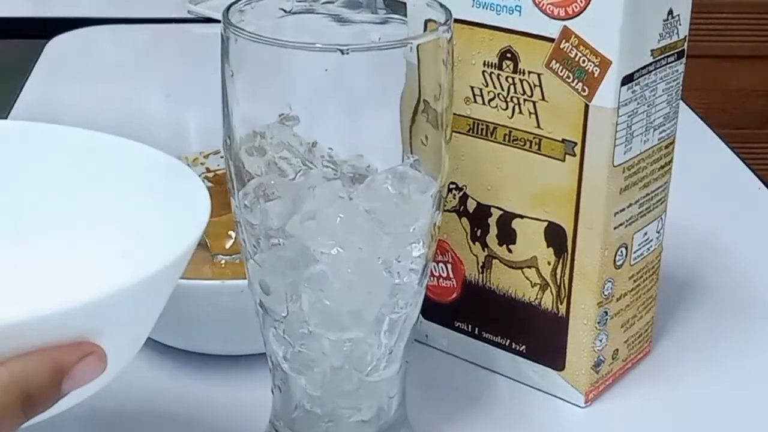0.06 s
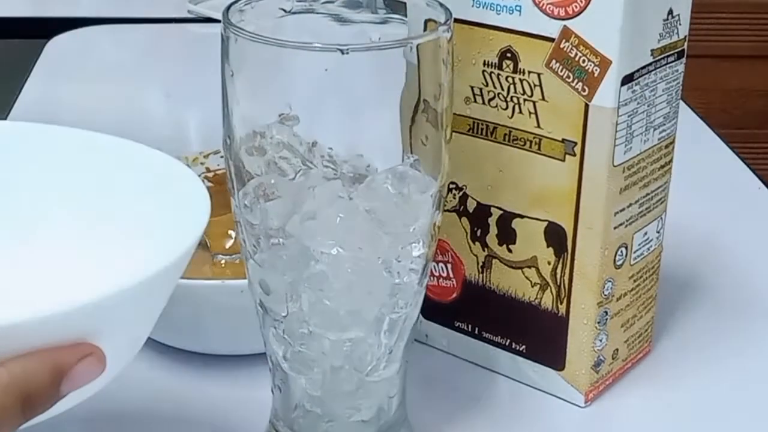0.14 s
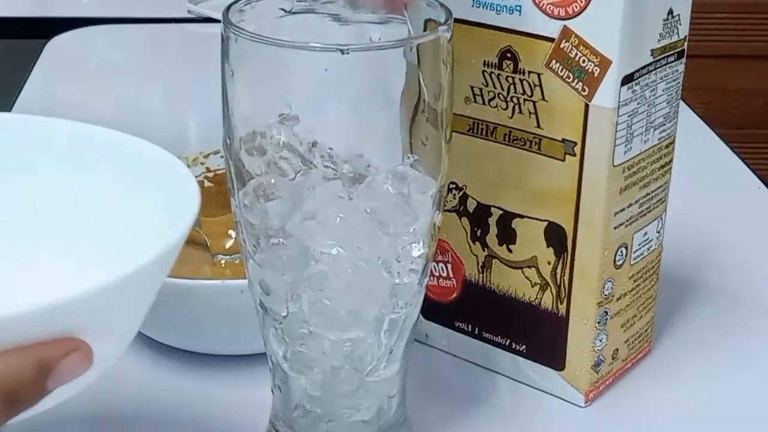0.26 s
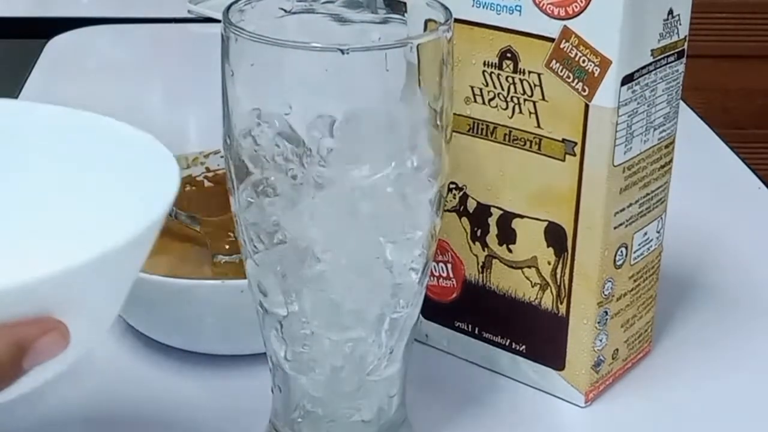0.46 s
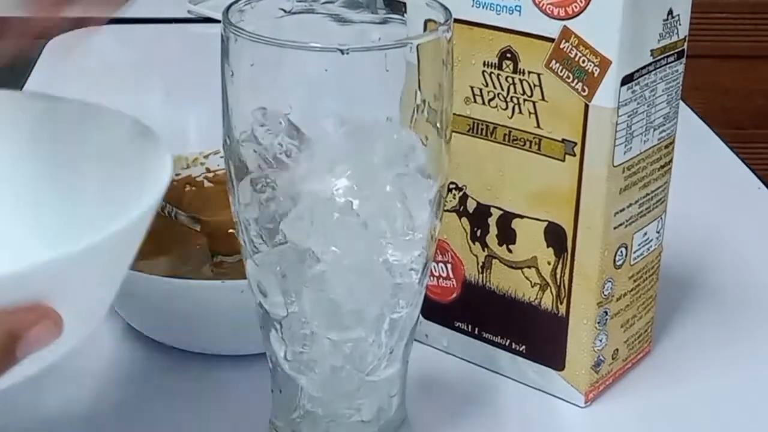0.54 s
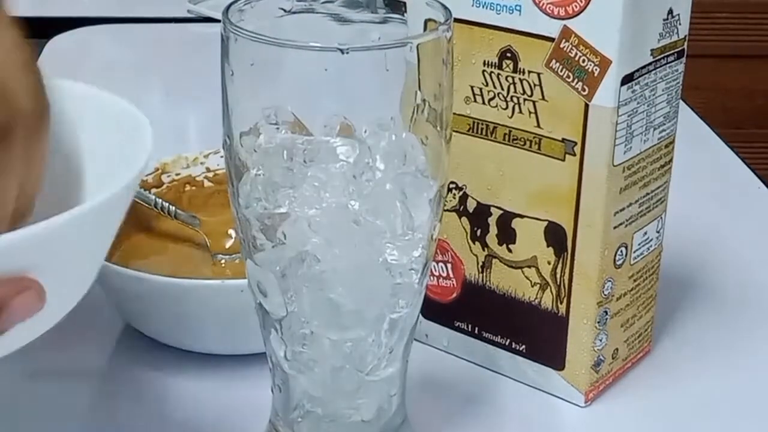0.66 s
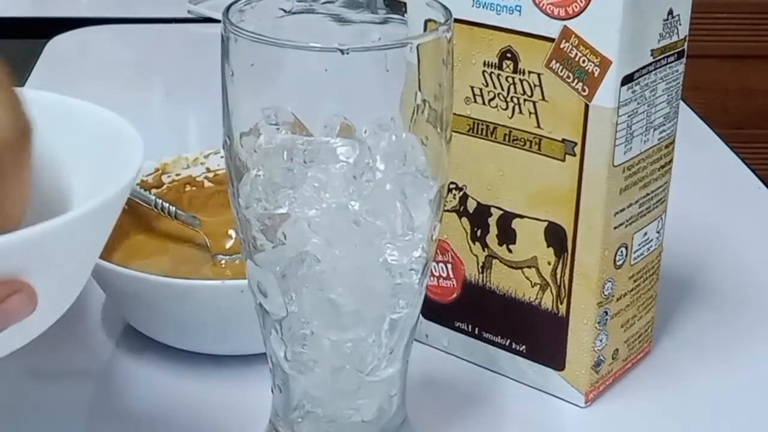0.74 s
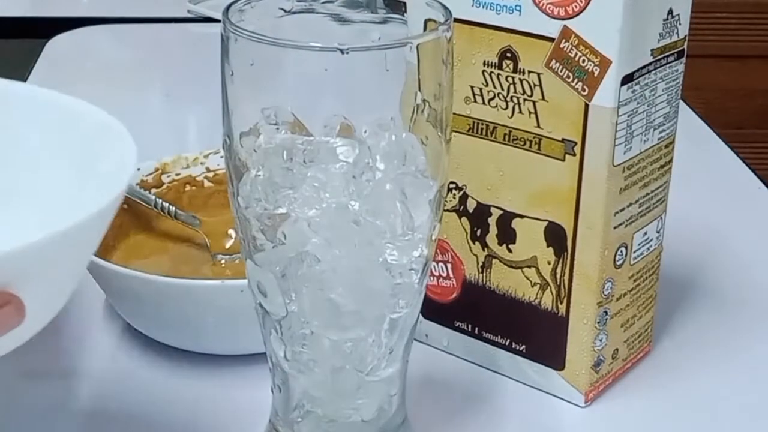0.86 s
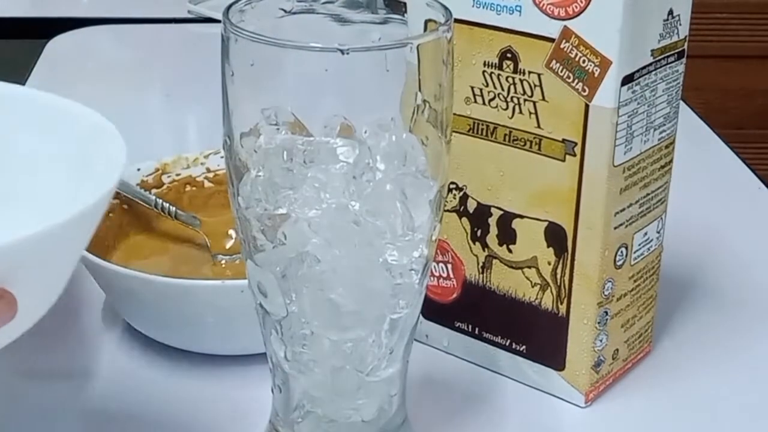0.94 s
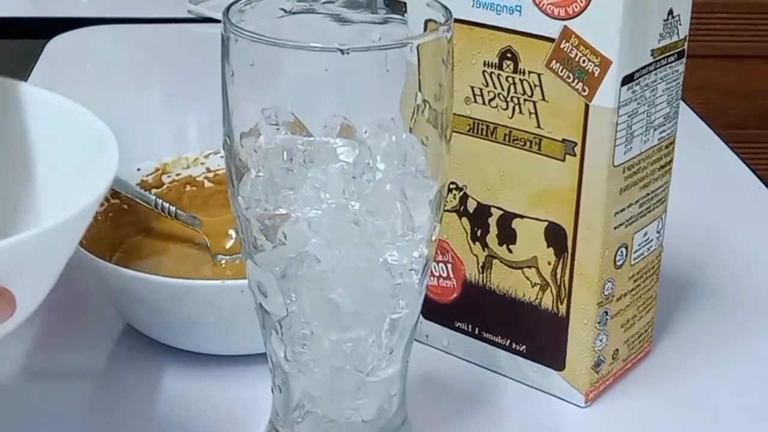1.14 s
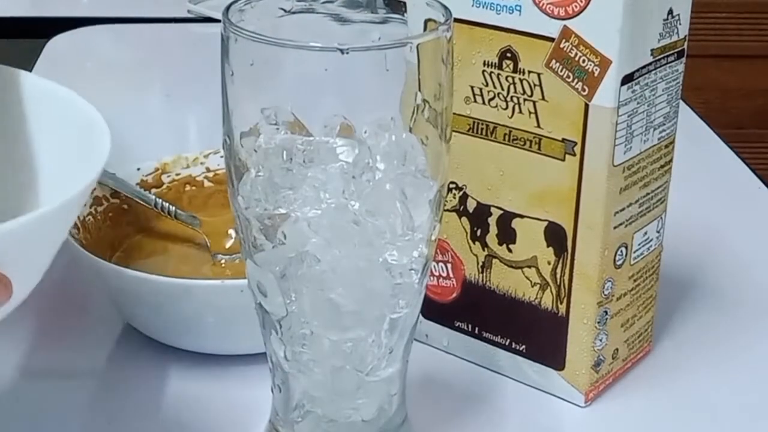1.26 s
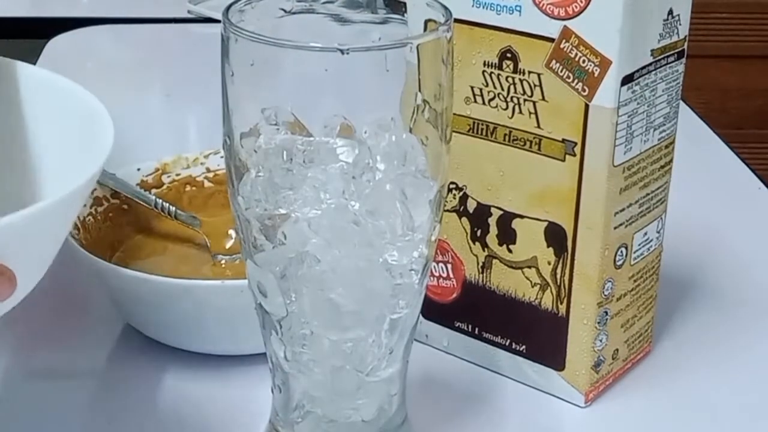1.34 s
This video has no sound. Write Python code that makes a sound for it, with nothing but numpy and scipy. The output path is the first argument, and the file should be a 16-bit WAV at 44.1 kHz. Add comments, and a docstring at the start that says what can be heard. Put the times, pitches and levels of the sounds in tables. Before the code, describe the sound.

Ice cubes clatter from a china bowl into a tall glass. They first skate faintly over the bowl, then from 0.2 to 0.6 seconds tumble in loudly, ticking on the glass and knocking on the ice inside. From 0.7 to 1.2 seconds leftover cubes slide and knock in the ringing bowl. A light rim clink comes near 1.4 seconds. Soft handling thumps and low kitchen noise lie underneath.

```python
"""Ice cubes are tipped from a hand-held china bowl into a tall glass half full of ice, in a small kitchen.
First they skate over the bowl and make it sing. From about 0.2 s they tumble into the glass, ticking on
its wall and knocking on the pile. From about 0.7 s the rest slide back in the bowl and knock together.
A light clink on the rim comes last. Soft handling thumps and a low room noise lie underneath."""
import sys
import numpy as np
from scipy import signal
from scipy.fft import rfft, irfft, next_fast_len
from scipy.io import wavfile

SR = 44100
rng = np.random.default_rng(int(sys.argv[2]) if len(sys.argv) > 2 else 0)


def inscribe(sig):
    """Save sig as 16-bit PCM at rate SR to the path in sys.argv[1].

    A 1-D sig is mono; a 2-D sig holds one channel per row.
    Samples are clipped to [-1, 1] before scaling.
    """
    pcm = np.round(np.clip(np.atleast_2d(sig).T, -1, 1) * 32767)
    wavfile.write(sys.argv[1], SR, pcm.astype(np.int16))


N = 61739
T = np.arange(N) / SR


# cubes land in the glass: start_s, crack_db, glass_db
GLASS_LANDINGS = [(0.2338, -39, -29), (0.2897, -19, -50), (0.2961, -22, -24), (0.345, -18.5, -22),
                  (0.3528, -16.5, -17), (0.3565, -20, -42), (0.3875, -23, -21.5), (0.3995, -19.5, -19),
                  (0.4265, -36, -22), (0.44, -36, -50), (0.4918, -20.5, -20.5), (0.5557, -30, -25.5),
                  (0.5715, -32, -25), (0.5934, -29, -37), (0.6153, -33, -36)]
# how loudly the cubes tumble on the pile and against the wall: time_s, pile_db, wall_db
TUMBLE_LEVELS = [(.22, -59, -60), (.3, -37.5, -42.5), (.34, -47.5, -37.5), (.36, -31, -23.5),
                 (.42, -34, -35), (.48, -33, -32), (.54, -37.5, -43), (.6, -33, -40), (.65, -42.5, -50.5),
                 (.76, -55, -62)]
# tones of the glass and the air in it: pitch_hz, level_db, ring_s (time to fade by 60 dB)
GLASS_TONES = [(610, -16.5, 0.13), (655.3, -1.5, 0.17), (1195, -7.5, 0.052), (1367, -5.5, 0.12),
               (1927, -9.5, 0.028), (2060, -5, 0.053), (2585, -7.5, 0.052), (7200, -5, 0.032)]
# how dull a knock on the pile is: frequency_hz, level_db
KNOCK_COLOUR = [(70, -13.5), (170, 2), (400, 2), (720, 4), (950, -3.5), (1300, 5), (2400, -7),
                (4000, -10.5), (10000, -46)]
KNOCK_DB, GLASS_RING_DB, TUMBLE_RING_DB = -3.5, -7, -6


def glass():
    """Cubes land on the pile with a dull knock and set the glass ringing."""
    def tones(push):
        return sum((-1) ** k * from_db(db) * ring(push, hz, ring_s)
                   for k, (hz, db, ring_s) in enumerate(GLASS_TONES))
    start_s, _, glass_db = np.transpose(GLASS_LANDINGS)
    pile_db, _ = levels_or_pitches(TUMBLE_LEVELS)
    landings = clicks(start_s, glass_db)
    patter = tiny_touches()
    knocks = from_db(KNOCK_DB) * crunch(landings, fade_s=.02) + from_db(pile_db) * patter
    landing_ring = from_db(GLASS_RING_DB) * tones(landings)
    tumble_ring = from_db(pile_db + TUMBLE_RING_DB) * unit_level(tones(patter))
    return colour(knocks, KNOCK_COLOUR) + landing_ring + tumble_ring


# cubes strike the glass wall: start_s, crack_db, tick_db, upper_ring_db
WALL_STRIKES = [(0.2227, -57, -64, -37.5), (0.2336, -28, -5, -33), (0.299, -27, -11.5, -23),
                (0.3635, -35, -14, -24), (0.3673, -40, -19, -28), (0.4053, -26, -18, -20.5),
                (0.464, -51, -31, -23.5), (0.494, -42, -38, -21), (0.597, -48, -25.5, -31)]
# the wall's thin upper ring: pitch_hz, level_db, ring_s
WALL_UPPER_TONES = [(5890, -2, .03), (5951, -7, .17)]
TICK_HZ, TICK_RING_S, TICK_SPLIT_HZ = 3214, .038, 43  # the wall's main tone, damped by the ice inside
UPPER_RATTLE_DB = -3.5


def glass_wall():
    """A cube on the glass wall gives a dry tick and a thin upper ring; tumbling cubes rattle both."""
    def upper_ring(push):
        return sum(from_db(db) * ring(push, hz, ring_s) for hz, db, ring_s in WALL_UPPER_TONES)
    start_s, _, tick_db, upper_db = np.transpose(WALL_STRIKES)
    _, wall_db = levels_or_pitches(TUMBLE_LEVELS)
    hits = clicks(start_s, tick_db)
    # two close tones beat; taking away a very short ring softens their start
    pair = sum(ring(hits, TICK_HZ + way * TICK_SPLIT_HZ / 2, TICK_RING_S) for way in (-1, 1)) / 2
    ticks = pair - ring(hits, TICK_HZ, ring_s=.007)
    rattle = unit_level(ring(scrape(TICK_HZ), TICK_HZ, TICK_RING_S))
    rattle += from_db(UPPER_RATTLE_DB) * unit_level(upper_ring(tiny_touches()))
    return ticks + upper_ring(clicks(start_s, upper_db)) + from_db(wall_db) * rattle


# cubes jostle against each other: time_s, level_db
JOSTLE_LEVELS = [(0, -45), (.09, -61.5), (.22, -62), (.25, -49), (.31, -36), (.34, -39), (.36, -29.5),
                 (.41, -28.5), (.48, -36), (.51, -39.5), (.61, -46), (.65, -51.5), (.78, -55.5),
                 (.83, -41.5), (.89, -51), (.99, -53), (1.06, -38), (1.2, -53), (1.3, -61.5)]
# how bright a crack of ice is: frequency_hz, level_db
CRACK_COLOUR = [(300, -48), (1300, -6.5), (1900, -5), (3000, 0), (4200, 3.5), (5300, -1), (6500, 0.5),
                (7600, -0.5), (8500, -13), (15000, -13.5)]
CLICK_BOOST_DB = 4


def ice_cracks():
    """Each hit on bowl or glass is a sharp click and a crunch; the cubes jostle in between."""
    hits = np.zeros(N)
    for table in (BOWL_STRIKES, WALL_STRIKES, GLASS_LANDINGS):
        start_s, crack_db = np.transpose(table)[:2]
        hits += clicks(start_s, crack_db)
    jostle_db, = levels_or_pitches(JOSTLE_LEVELS)
    jostle = from_db(jostle_db) * tiny_touches()
    return colour(from_db(CLICK_BOOST_DB) * hits + crunch(hits, fade_s=.016) + jostle, CRACK_COLOUR)


# a hard corner of a cube hits: start_s, level_db
CORNER_HITS = [(0.223, -35.5), (0.2334, -29), (0.465, -38), (.4865, -32), (.6854, -44), (0.8088, -35),
               (1.3749, -28)]
# how bright its snap is: frequency_hz, level_db
SNAP_COLOUR = [(2500, -9.5), (6000, -3.5), (9000, -6.5), (14500, -2)]


def corner_snaps():
    """A hard corner adds a bright snap: a click and a slightly longer crunch."""
    hits = clicks(*np.transpose(CORNER_HITS))
    return colour(from_db(CLICK_BOOST_DB) * hits + crunch(hits, fade_s=.028), SNAP_COLOUR)


# cubes strike the bowl: start_s, crack_db, low_ring_db, upper_ring_db; the first row, at 0.001 s, has the bowl
# already ringing as the sound begins
BOWL_STRIKES = [(0.001, -70, -32, -40), (0.0254, -49, -43, -49), (0.6669, -39, -41, -38.5),
                (0.7745, -57, -60, -44.5), (0.8093, -40, -45, -28.5), (0.8415, -51, -43, -30.5),
                (0.9289, -52, -47, -37), (0.991, -35.5, -56, -36), (1.0036, -31, -44, -50),
                (1.0082, -28.5, -46, -27.5), (1.0124, -32, -45, -54), (1.0256, -28.5, -34, -33),
                (1.0463, -19.5, -26, -30), (1.0494, -29.5, -33, -46), (1.1725, -37.5, -37.5, -50)]
# ice skates over the bowl: time_s, low_ring_db, upper_ring_db
SKATE_LEVELS = [(0, -38.5, -54), (.08, -49, -60), (.2, -62, -72), (.78, -58, -58.5), (0.832, -40.5, -39.5),
                (.88, -47.5, -50), (.97, -55.5, -58), (1.06, -44, -47), (1.2, -58.5, -59.5),
                (1.35, -63.5, -66.5)]
# the bowl's two rings drift as the load moves: time_s, low_pitch_hz, upper_pitch_hz
BOWL_PITCHES = [(.05, 3620, 6150), (.7, 3370, 6120), (0.779, 3520, 6020), (0.819, 3560, 6270),
                (.93, 3680, 6306), (1.05, 3700, 6470)]
# each ring is a few close tones: offset_share_of_pitch, level_db
BOWL_CLOSE_TONES = [(-.015, -5), (0, -3.5), (.019, -8)]
BOWL_RING_S = 0.051
RASP_HZ, RASP_DB, RASP_FADE_DB_PER_S = 3383, -55.5, 4.5


def bowl():
    """The china rings at two pitches when struck or skated over, and the sliding ice rasps."""
    start_s, _, *hit_dbs = np.transpose(BOWL_STRIKES)
    pitches, skate_dbs = levels_or_pitches(BOWL_PITCHES), levels_or_pitches(SKATE_LEVELS)
    sound = from_db(RASP_DB - RASP_FADE_DB_PER_S * T) * scrape(RASP_HZ)
    for hz, hit_db, skate_db in zip(pitches, hit_dbs, skate_dbs):
        hits, slips = clicks(start_s, hit_db), scrape(hz)
        for offset, db in BOWL_CLOSE_TONES:
            tone_hz = hz * (1 + offset)
            singing = from_db(skate_db) * unit_level(ring(slips, tone_hz, BOWL_RING_S))
            struck = ring(uneven(hits), tone_hz, BOWL_RING_S)
            sound += from_db(db) * (struck + singing)
    return sound


# tones of the rim: pitch_hz, level_db, ring_s
RIM_TONES = [(4307, -33, .09), (5997, -34, .03), (6400, -32, .05), (7985, -33, .03)]


def rim_clink(start_s=1.3745):
    """One last light tap on the rim rings a few high tones."""
    return sum(ring(clicks(np.array([start_s]), db), hz, ring_s) for hz, db, ring_s in RIM_TONES)


# faint, very high tones left by a contact: pitch_hz, level_db, ring_s
SHIMMER_TONES = [(9840, -14, .07), (11020, -17, .04), (12400, -11, .035), (13640, -13, .07),
                 (14700, -14, .035)]
SHIMMER_HIT_DB, SHIMMER_RATTLE_DB = -13.5, -28.5


def shimmer():
    """Hard corners stir a high shimmer; hits and rattling on the glass wall stir it less."""
    start_s, _, _, upper_db = np.transpose(WALL_STRIKES)
    _, wall_db = levels_or_pitches(TUMBLE_LEVELS)
    hits = clicks(*np.transpose(CORNER_HITS)) + clicks(start_s, upper_db + SHIMMER_HIT_DB)
    rattle = from_db(wall_db + SHIMMER_RATTLE_DB) * tiny_touches()
    return sum(from_db(db) * ring(uneven(hits + rattle), hz, ring_s) for hz, db, ring_s in SHIMMER_TONES)


# soft thumps from handling: start_s, level_db
HANDLING_THUMPS = [(0.213, -25.5), (0.267, -35), (0.288, -28.5), (.415, -36), (0.539, -37), (0.667, -33.5),
                   (0.692, -33.5), (0.772, -31.5), (0.882, -33), (0.987, -33), (1.063, -32), (1.099, -31.5),
                   (1.141, -25), (1.19, -34.5), (1.23, -34.5), (1.275, -35)]
THUMP_HZ, THUMP_SWELL_S, THUMP_SPREAD_OCTAVES = 97, 0.0028, 0.49


def handling():
    """Low thumps swell and die within two or three swings, each at its own pitch."""
    swell = (T / THUMP_SWELL_S) ** 2 * np.exp(-T / THUMP_SWELL_S)
    pitches = THUMP_HZ * 2 ** (THUMP_SPREAD_OCTAVES * rng.uniform(-1.1, 1, len(HANDLING_THUMPS)))
    sound = np.zeros(N)
    for (start_s, db), hz in zip(HANDLING_THUMPS, pitches):
        thump = swell / swell.max() * np.sin(2 * np.pi * hz * T)
        sound += from_db(db) * np.interp(T - start_s, T, thump)
    return sound


def kitchen_echo(sound, fade_s=0.15, delay_s=0.0042):
    """The kitchen walls send the sound back as a short blur."""
    fade_in = np.clip(T / delay_s - 1, 0, 1)
    tail = rng.standard_normal(N) * from_db(-60 * T / fade_s) * fade_in
    return signal.fftconvolve(sound, tail / np.sqrt(np.sum(tail ** 2)))[:N]


# room noise that both ears share: frequency_hz, level_db
ROOM_SHARED_COLOUR = [(35, -6.5), (70, 4), (130, -7.5), (200, 5.5), (270, -1.5), (520, -7), (750, -2),
                      (1500, -14), (2200, -28), (5500, -34.5), (9000, -43)]
# room noise that differs between the ears: frequency_hz, level_db
ROOM_SIDE_COLOUR = [(90, -34), (200, -5), (1300, -10), (6000, -48.5)]
ROOM_SHARED_DB, ROOM_SIDE_DB, LEAN_RIGHT_DB = -46.5, -61, 2


def room_noise():
    """Low steady noise, a little wide and leaning to the right."""
    shared = from_db(ROOM_SHARED_DB) * colour(rng.standard_normal(N), ROOM_SHARED_COLOUR)
    side = from_db(ROOM_SIDE_DB) * colour(rng.standard_normal(N), ROOM_SIDE_COLOUR)
    return np.array([from_db(-LEAN_RIGHT_DB) * shared + side, from_db(LEAN_RIGHT_DB) * shared - side])


def clicks(start_s, level_db):
    """One click for each event."""
    sound = np.zeros(N)
    np.add.at(sound, np.clip((start_s * SR).astype(int), 0, N - 1), from_db(level_db))
    return sound


def tiny_touches(per_s=2200, spread_db=2.5):
    """A dense random patter of tiny contacts."""
    sizes = from_db(spread_db * np.minimum(rng.exponential(1, N), 4)) * rng.choice([-1, 1], N)
    return unit_level(sizes * (rng.random(N) < per_s / SR))


def scrape(hz, ring_s=.007):
    """Tiny slips, rung briefly twice over, make a hiss around one pitch."""
    return unit_level(ring(ring(tiny_touches(), hz, ring_s), hz, ring_s))


def crunch(hits, fade_s):
    """Each hit sets off a quick puff of noise."""
    return die_away(hits, fade_s) * rng.standard_normal(N)


def uneven(hits, spread_db=1):
    """Each hit pushes or pulls at random, with a strength of its own."""
    strength = from_db(spread_db * np.clip(rng.standard_normal(N), -2, 2))
    return hits * strength * rng.choice([-1, 1], N)


def ring(push, hz, ring_s):
    """Each push starts a fading tone of steady or drifting pitch."""
    turn = np.exp(2j * np.pi * np.cumsum(hz * np.ones(N)) / SR)
    return (die_away(push / turn, ring_s) * turn).imag


def die_away(push, fade_s):
    """Each push fades by 60 dB in fade_s."""
    return signal.lfilter([1], [1, -from_db(-60 / (fade_s * SR))], push + 1e-18)


def colour(sound, points):
    """Set the balance of low and high; white noise would keep its overall level."""
    size = 2 * next_fast_len(N)
    hz, db = np.transpose(points)
    log_hz = np.log(np.fft.rfftfreq(size, 1 / SR) + 1)
    gain = unit_level(from_db(np.interp(log_hz, np.log(hz), db)))
    # fold the filter forward in time, so nothing sounds before its hit
    folded = irfft(np.log(gain))
    folded[1:size // 2] *= 2
    folded[size // 2 + 1:] = 0
    return irfft(rfft(sound, size) * np.exp(rfft(folded)))[:N]


def levels_or_pitches(rows):
    """Join a table's points in time with straight lines, one curve per column."""
    time_s, *columns = np.transpose(rows)
    return [np.interp(T, time_s, column) for column in columns]


def unit_level(sound):
    """Scale to an average (rms) level of 1."""
    return sound / np.sqrt(np.mean(sound ** 2) + 1e-20)


def from_db(db):
    """Turn decibels into a multiplier."""
    return 10 ** (np.asarray(db) / 20)


CLATTER_ECHO_DB, GLASS_WALL_ECHO_DB = -9.5, -16


def scene():
    """Ice, bowl and glass are straight ahead; the near glass wall has less echo than the rest."""
    clatter = ice_cracks() + corner_snaps() + shimmer() + bowl() + glass() + rim_clink()
    ticks = glass_wall()
    echo = kitchen_echo(from_db(CLATTER_ECHO_DB) * clatter + from_db(GLASS_WALL_ECHO_DB) * ticks)
    return clatter + ticks + echo + handling() + room_noise()


LOW_CUT_HZ, HIGH_CUT_HZ = 50.5, 15800


def record(dry):
    """The microphone drops the deep bass; the highest treble is cut steeply."""
    thin = signal.sosfilt(signal.butter(3, LOW_CUT_HZ, "high", fs=SR, output="sos"), dry)
    return signal.sosfilt(signal.ellip(10, .2, 70, HIGH_CUT_HZ, fs=SR, output="sos"), thin)


dry = scene()
out = record(dry)
inscribe(out)
```